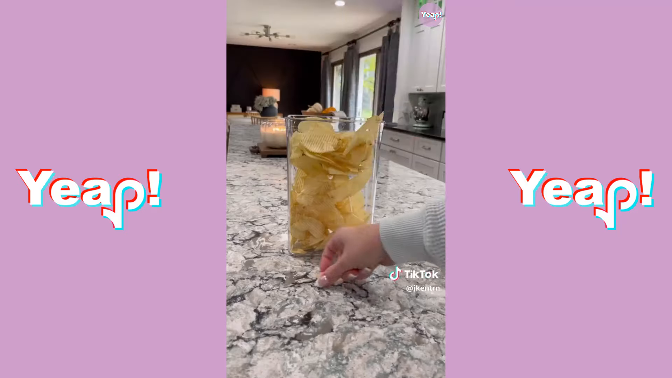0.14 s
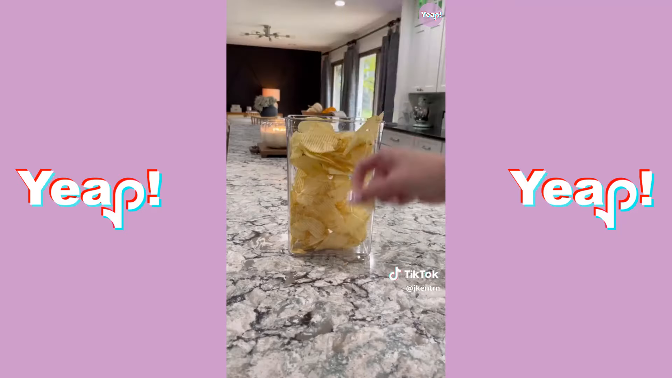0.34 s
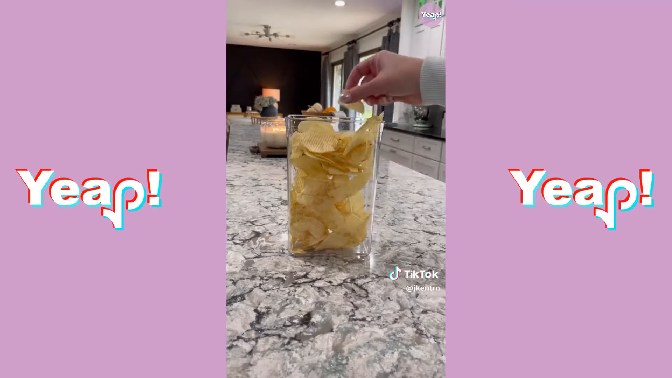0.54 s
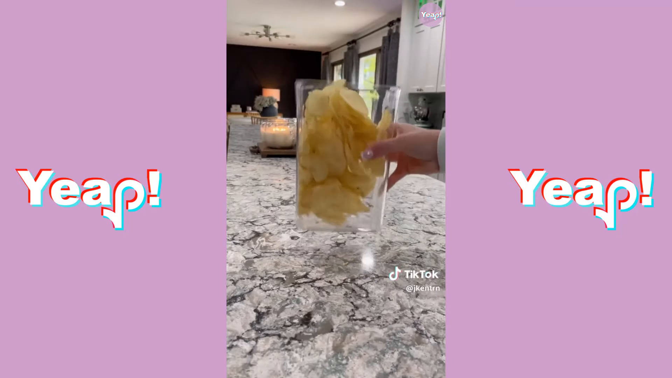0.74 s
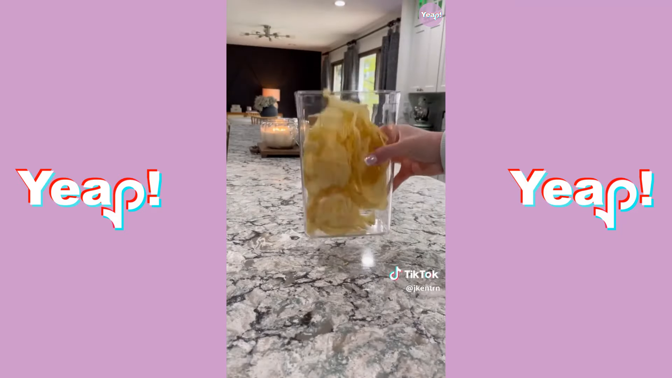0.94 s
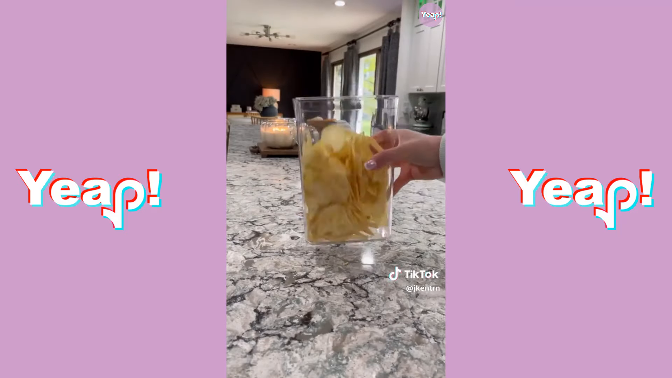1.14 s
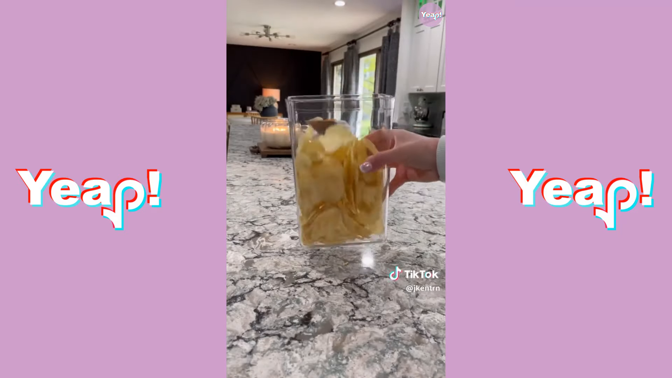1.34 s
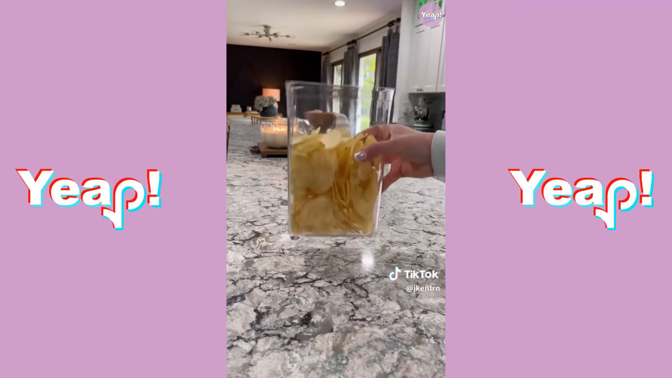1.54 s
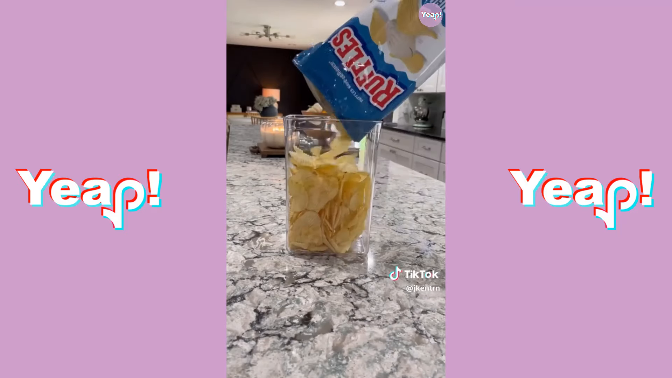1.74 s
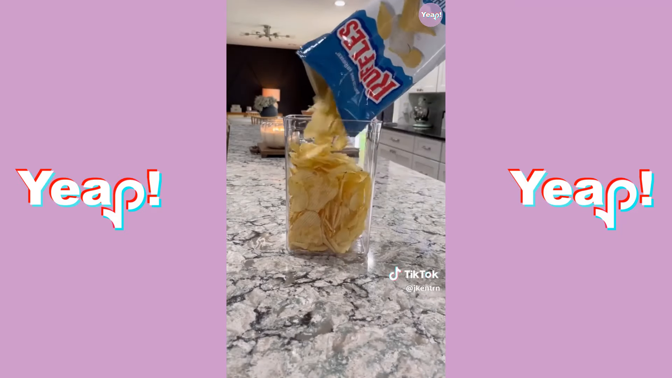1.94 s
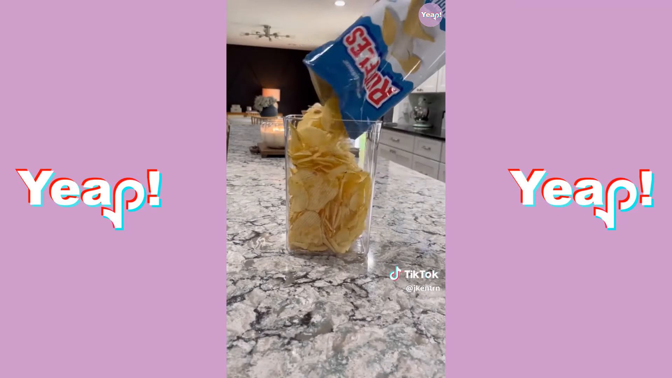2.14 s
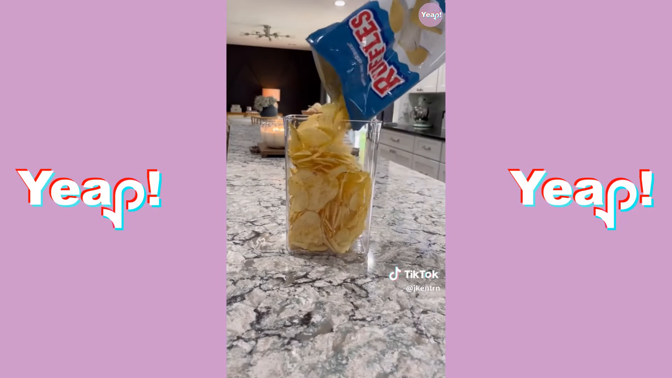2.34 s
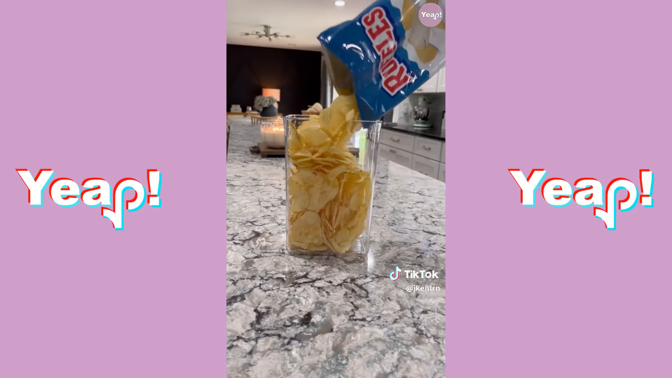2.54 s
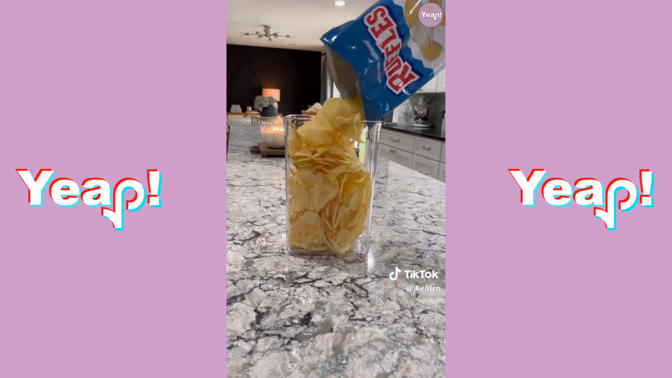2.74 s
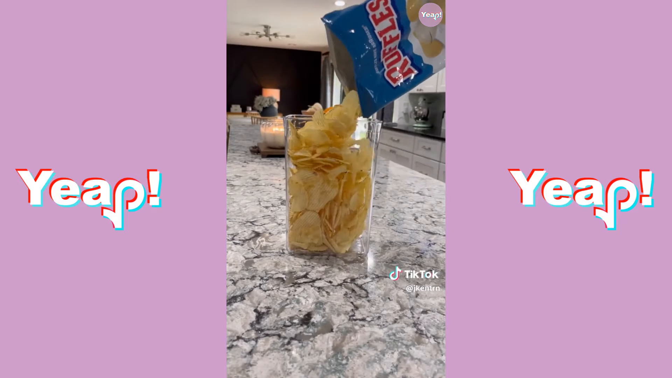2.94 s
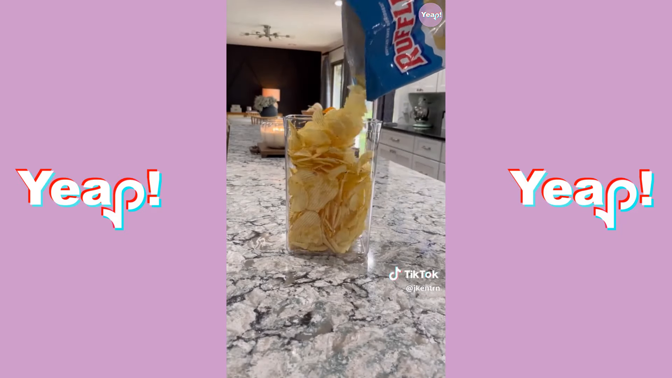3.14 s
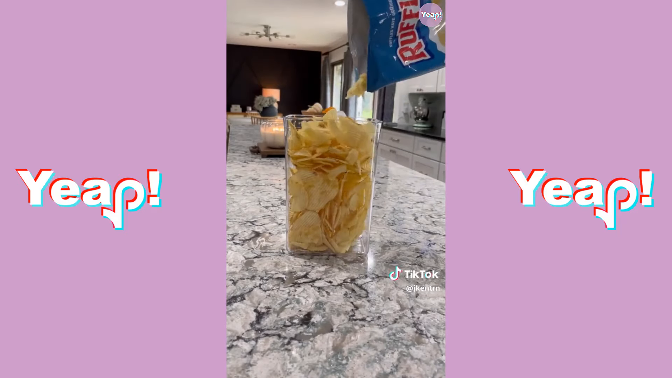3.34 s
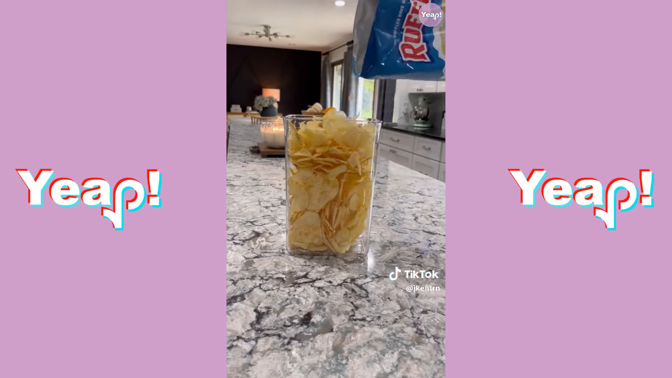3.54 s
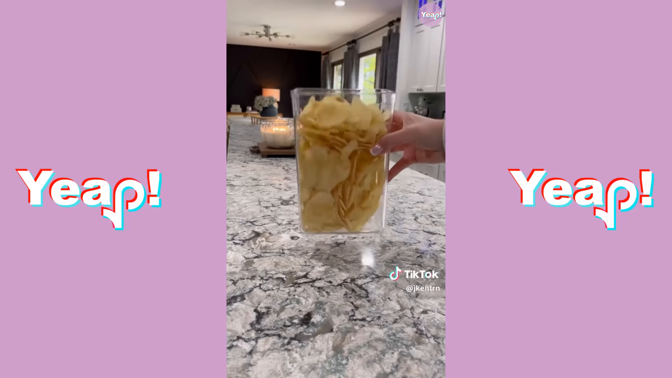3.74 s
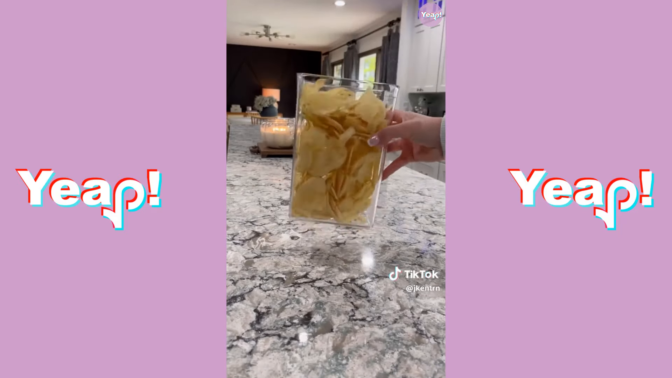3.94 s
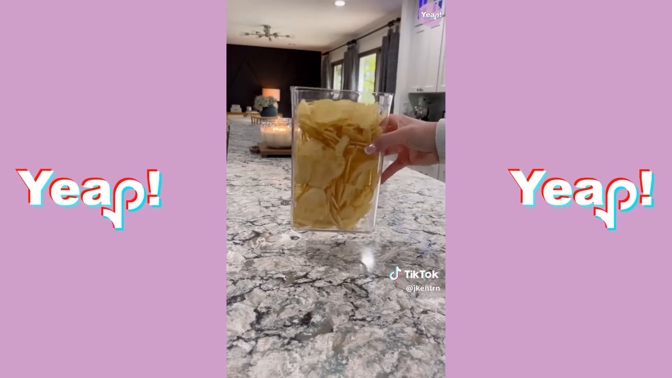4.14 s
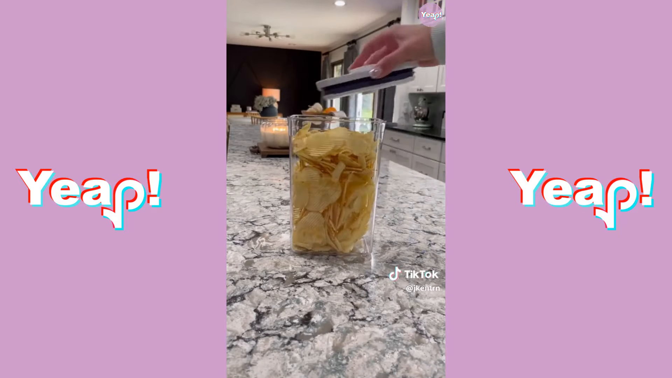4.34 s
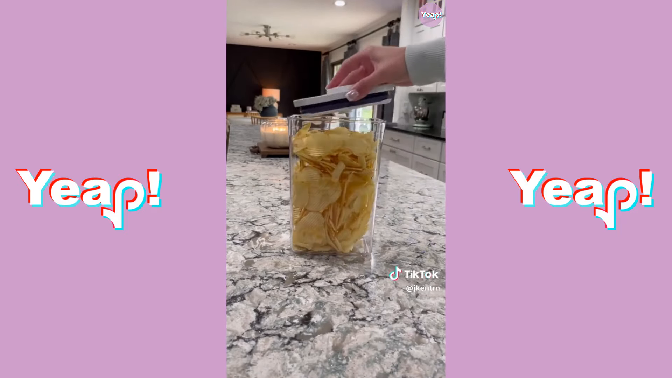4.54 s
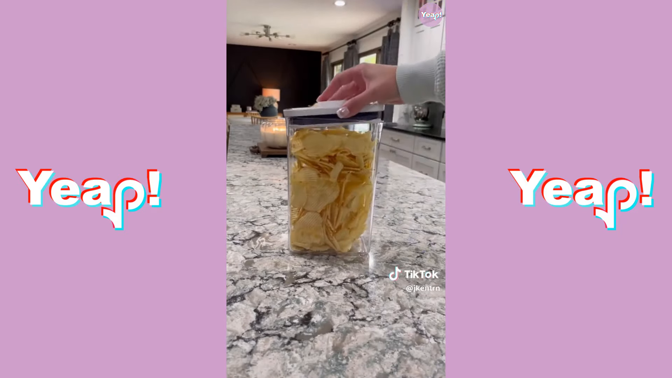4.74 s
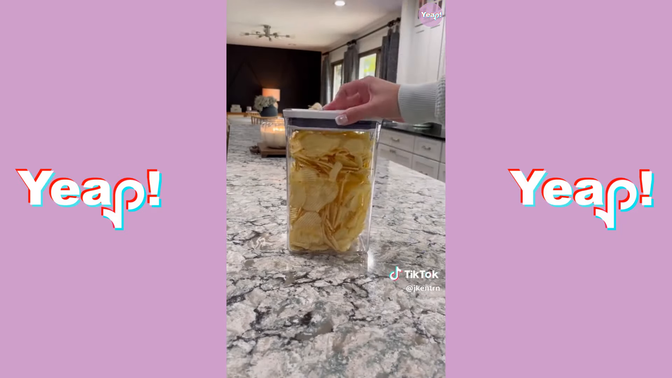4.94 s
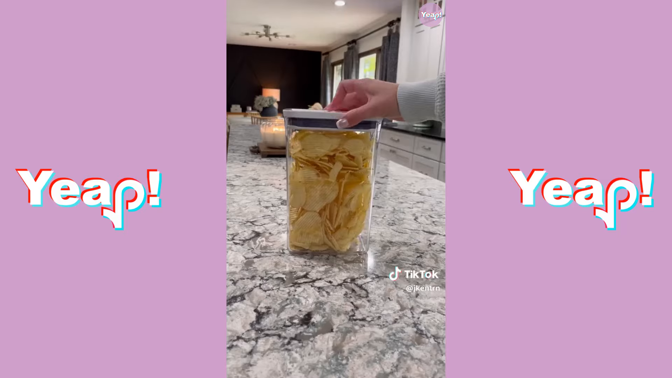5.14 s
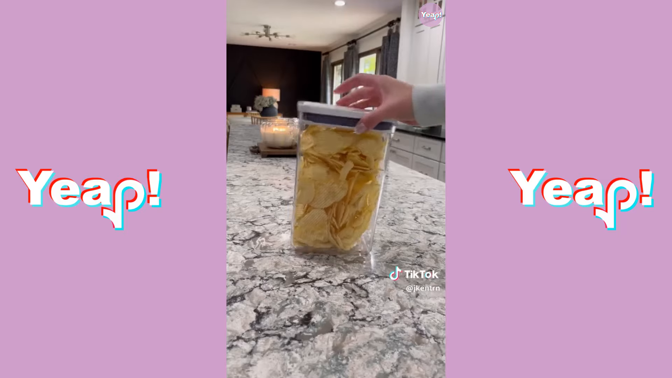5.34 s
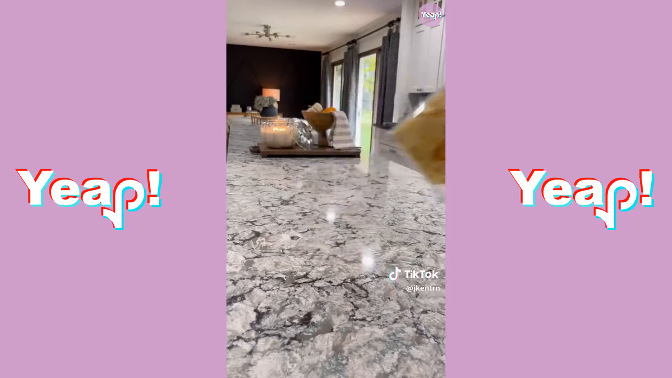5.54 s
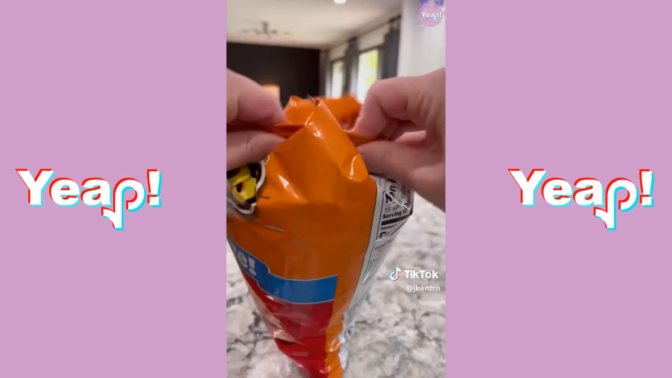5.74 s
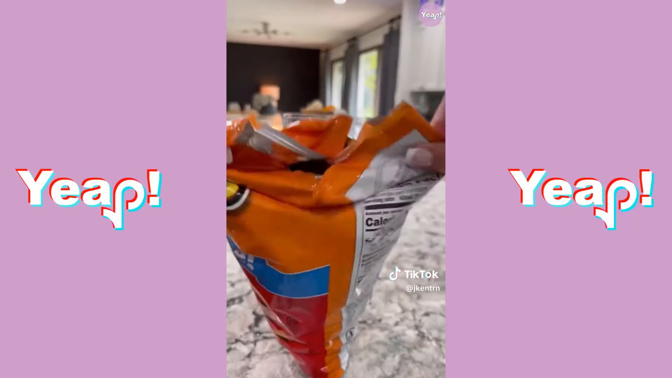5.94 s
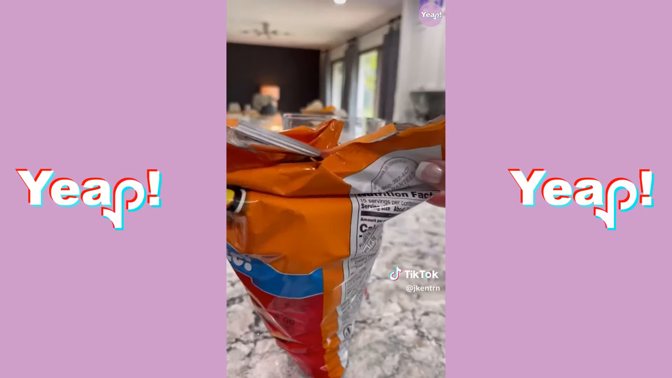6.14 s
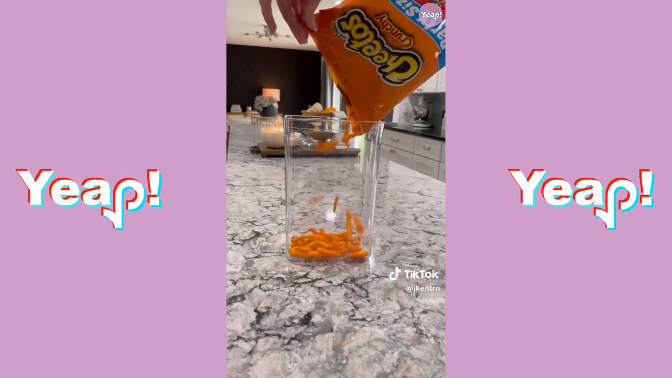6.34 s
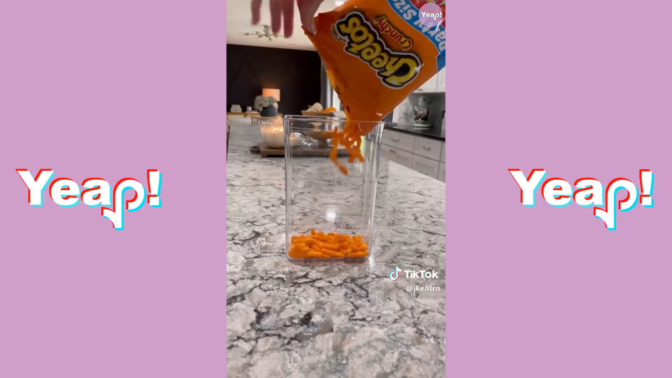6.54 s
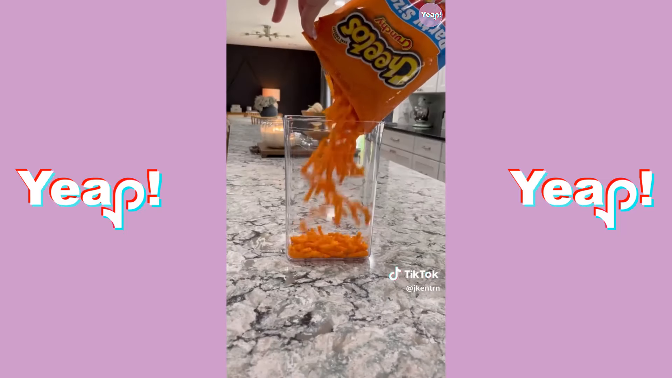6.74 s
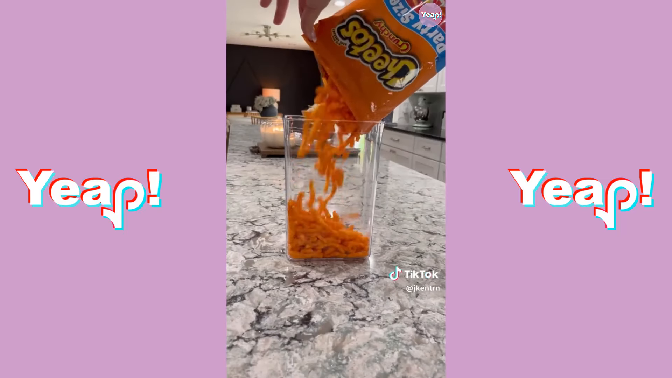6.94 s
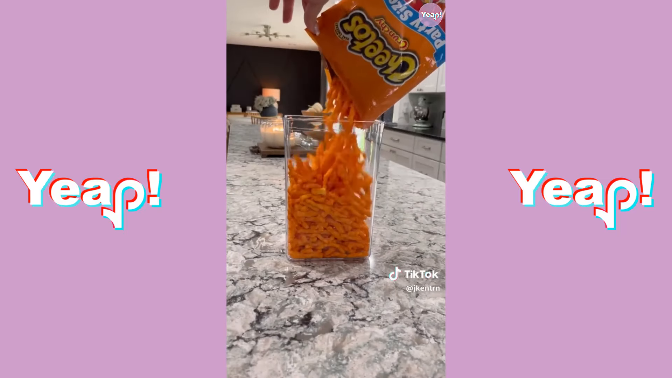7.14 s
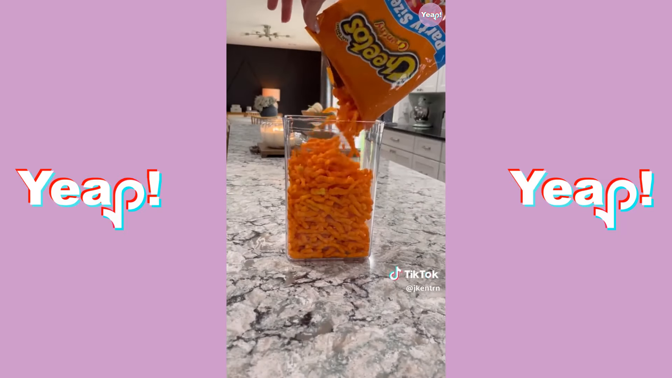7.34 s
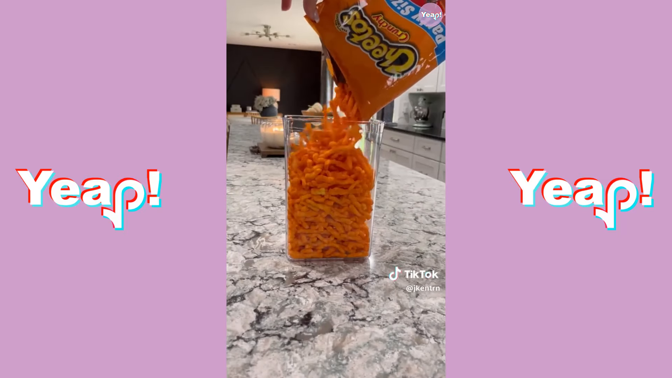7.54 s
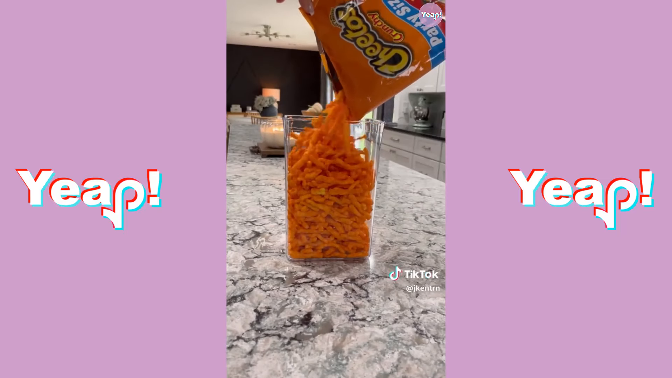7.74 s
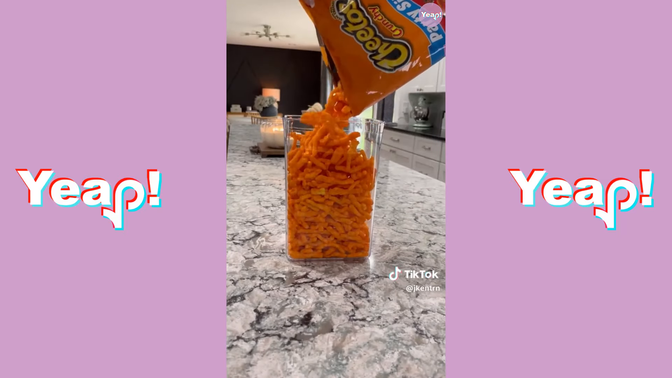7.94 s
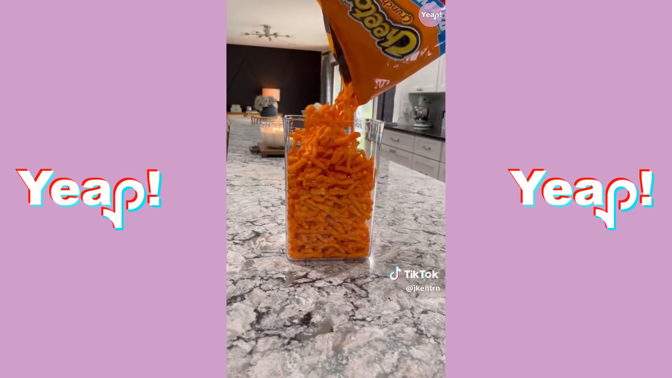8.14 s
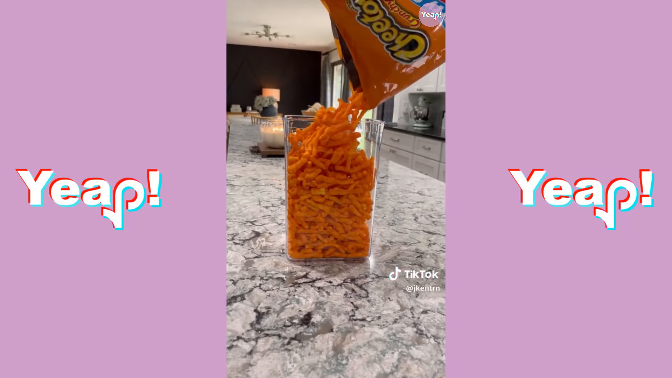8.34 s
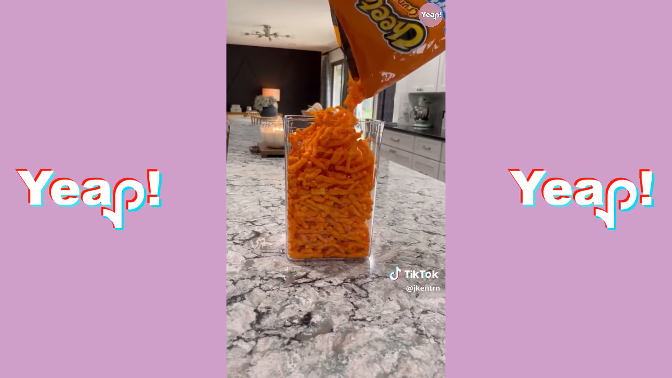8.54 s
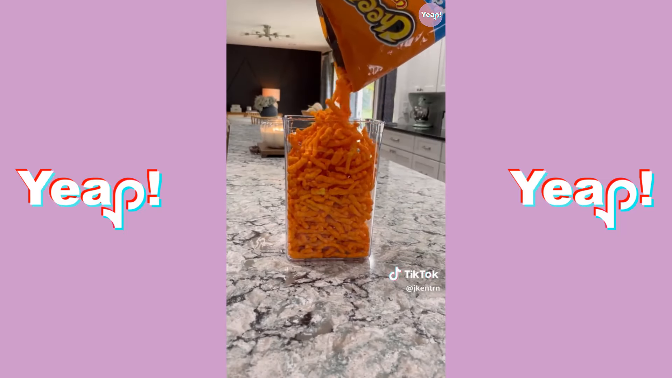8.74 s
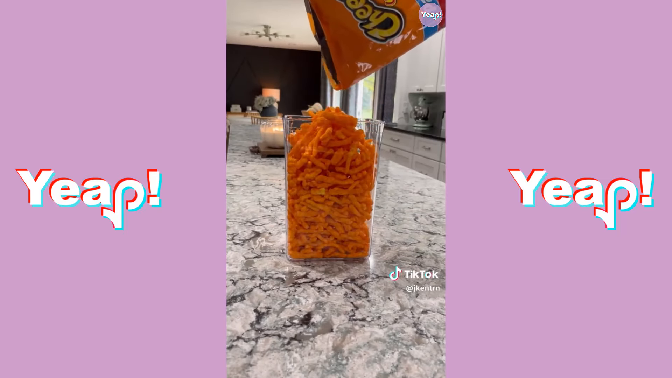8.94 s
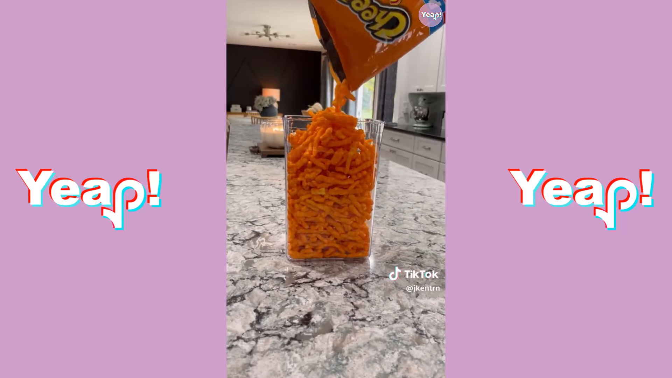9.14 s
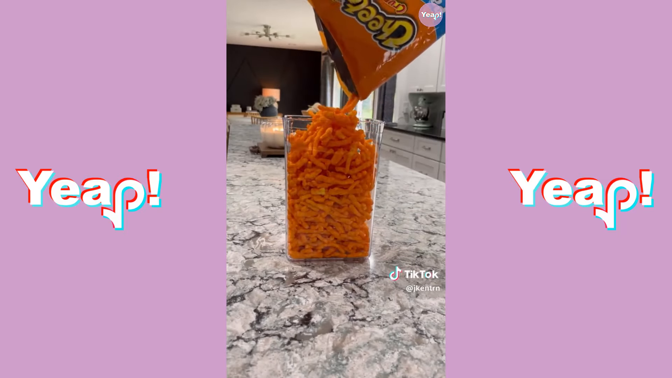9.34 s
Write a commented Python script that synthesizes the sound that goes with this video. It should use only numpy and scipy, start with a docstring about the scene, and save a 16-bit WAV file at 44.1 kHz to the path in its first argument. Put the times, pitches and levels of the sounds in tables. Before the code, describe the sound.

Close kitchen sounds: brittle chips rattling and thumping in a plastic tub, a snapping lid, foil tearing in two pulls, then a dense rush of corn puffs.

```python
"""A stone kitchen counter, heard close up in several shots joined by hard cuts, over an appliance's hum.
Potato chips slide from a foil bag into a plastic canister, are shaken down and topped up; the lid clicks shut.
A second bag is ripped open in two pulls and corn puffs pour into an empty canister.
Snacks and foil are built from many tiny noise fractures; canister, lid and bag panels ring as damped modes;
hard walls answer with decaying noise."""
import sys
import numpy as np
from scipy import signal
from scipy.fft import rfft, irfft, next_fast_len
from scipy.io import wavfile
from scipy.ndimage import map_coordinates

SR = 44100
rng = np.random.default_rng(int(sys.argv[2]) if len(sys.argv) > 2 else 0)


def wav_record(signal):
    """Record a signal, one row per channel, as 16-bit PCM in the file named by sys.argv[1]."""
    frames = np.transpose(np.atleast_2d(signal))
    bounded = np.clip(frames, -1, 1)
    # unit amplitude maps onto the largest positive 16-bit level
    quanta = np.round(bounded * 32767).astype(np.int16)
    wavfile.write(sys.argv[1], SR, quanta)


N = 414540
TIME = np.arange(N) / SR
SECOND_BAG_S = 6.35  # from here on, corn puffs instead of chips

# start of each shot and the end of the last: time [s]
CUTS = [0, 1.804, 4.395, 4.962, 5.377, 9.4]
# spectrum of plastic clicks and of a shaken foil sheet: (frequency [Hz], relative level per Hz [dB])
CLICK_SPECTRUM = [(100, -15), (230, 5), (400, 0), (700, -1), (1200, -5.5), (2000, -4), (3500, -12),
                  (8000, -25), (16000, -46.5)]
# the lid's catch ticks as it is pressed: (time [s], level [dB])
CATCH_TICKS = [(4.813, -37), (4.883, -32.5), (5.02, -43), (5.041, -39), (5.062, -33), (5.082, -30.5)]


def amp(db):
    """Decibels to gain."""
    return 10 ** (np.asarray(db) / 20)


def unit(x):
    """Scale to rms 1."""
    return x / np.sqrt(np.mean(x ** 2) + 1e-20)


def along(points, hz):
    """(Hz, value) points read on a log frequency axis."""
    f, v = np.transpose(points)
    return np.interp(np.log(hz + 1), np.log(f + 1), v)


def filtered(x, response):
    """x times a complex response of frequency."""
    m = next_fast_len(x.shape[-1] + 8192)
    spectrum = rfft(x, m) * response(np.fft.rfftfreq(m, 1 / SR))
    return irfft(spectrum, m)[..., :x.shape[-1]]


def high_passed(x, corner_hz, order):
    """Remove the bass below a corner without shifting phase."""
    return filtered(x, lambda hz: hz ** order / (hz ** order + corner_hz ** order))


def coloured(x, spectrum, size=2048):
    """Causal minimum-phase filter of unit energy with the given spectrum."""
    cepstrum = irfft(np.log(amp(along(spectrum, np.fft.rfftfreq(size, 1 / SR)))))
    cepstrum[1:size // 2] *= 2
    cepstrum[size // 2 + 1:] = 0
    kernel = irfft(np.exp(rfft(cepstrum)))
    return signal.oaconvolve(x, kernel[None] / np.linalg.norm(kernel), axes=1)[:, :x.shape[1]]


def add(track, s, sound):
    """Mix a sound into a track at time s."""
    part = track[:, max(round(s * SR), 0):][:, :sound.shape[-1]]
    part += sound[..., :part.shape[1]]


def wobble(rate):
    """A smooth random curve, rate knots a second."""
    knots = rng.standard_normal(int(N * rate / SR) + 4)
    coarse = TIME[::32]
    return np.interp(TIME, coarse, map_coordinates(knots, [coarse * rate]))


def surges(rows, rise):
    """Gain of bursts that swell 60 dB in rise seconds, hold and die away; their powers add."""
    power = np.zeros((1, N))
    t = np.arange(SR) / SR - .1
    for s, db, hold, t60 in rows:
        fade = np.maximum(-t / rise, 0) + np.maximum((t - hold) / t60, 0)
        add(power, s + t[0], amp(db - 60 * fade) ** 2)
    return np.sqrt(power[0])


def crack(t60, attack=0.00031, size=2048):
    """One brittle fracture, mid and side: it spreads through the piece, then dies away."""
    t = np.arange(size) / SR
    return rng.standard_normal((2, size)) * amp(-60 * t / t60) * (1 - np.exp(-t / attack))


def crackle(rate, spread_db, t60, count=8):
    """Dense tiny fractures of uneven size, in several families that each ring differently."""
    out = np.zeros((2, N))
    for _ in range(count):
        where, size, sign = rng.random((int(rate * N / SR / count), 3)).T
        sizes = amp(spread_db * np.minimum(-np.log(1 - size), 3)) * np.sign(sign - .5)
        train = np.bincount((where * N).astype(int), sizes, N)
        out += signal.oaconvolve(train[None], crack(t60, size=512), axes=1)[:, :N]
    return unit(out)


def ping(hz, cycles, size=2048):
    """A damped swing that has fallen 60 dB after some cycles."""
    turns = hz * np.arange(size) / SR
    return amp(-60 * turns / cycles) * np.sin(2 * np.pi * turns)


def scattered(gain, rate, db, spread_db):
    """Random events (s, dB) whose strength follows a gain curve."""
    where, size = rng.random((int(rate * N / SR), 2)).T
    levels = 20 * np.log10(gain[(where * N).astype(int)] + 1e-9) + db + spread_db * (2 * size - 1)
    return list(zip(where * N / SR, levels))


def movement(start, end):
    """Gain of one movement of the hand: it sets in, lasts and dies away, or stops at the next cut."""
    onset_s, stop_t60_s = 0.008, 0.4
    cut = min(s for s in CUTS if s > (start + end) / 2)
    onset = np.clip((TIME - start) / onset_s, 0, 1)
    return onset * amp(-60 * np.maximum(TIME - end, 0) / stop_t60_s) * (TIME < cut)


def snacks():
    """Pieces tumble in clumps and jolt as a heap; their contacts crunch, clack and drive the canister."""
    # a clump slides out of the bag or off the wall and lands: (time [s], level [dB], hold [s])
    clumps = [(.04, -35.5, 0.018), (1.772, -29.5, 0.02), (1.871, -34.5, .02), (1.95, -34.5, .07),
              (2.092, -29.5, 0.04), (2.195, -38.5, .06), (2.345, -38, 0.02), (2.469, -37, 0.028),
              (2.717, -34.5, 0.029), (2.83, -34.5, 0.014), (2.965, -45, 0.132), (3.317, -35.5, 0.036),
              (6.4, -22, 0.011), (6.45, -19.5, 0.0085), (6.523, -25, 0.028), (6.724, -21, 0.0145),
              (6.775, -20, 0.0064), (6.846, -18.3, 0.07), (6.955, -31.5, 0.076), (7.187, -27, 0.091),
              (7.635, -37, 0.08), (7.85, -35.5, 0.013), (8.311, -44, 0.054)]
    # spectrum of the direct crunch: (frequency [Hz], relative level per Hz [dB])
    crunch_spectrum = [(100, -23), (200, -1.5), (310, 9.5), (540, -10), (720, 1.5), (1200, -11.5),
                       (2350, 1), (3200, -11.5), (4400, -11.5), (7000, -10), (10000, -15.5), (14000, -8)]
    clump_t60_s = 0.085
    thump_db, hard_landing_db = -8.5, -11  # drumming on bare plastic grows faster than the landing
    thump_ring_db, strike_ring_db = -19.5, -11.5  # push of thumps and hard ticks on the canister

    (poured, bare), (rustle, tosses, shaken_bare) = pouring(), shaking()
    smack, push = slaps()
    ticks = strikes()
    flow = (poured + rustle) * amp(3.2 * wobble(40))
    landings = surges([(s, db, hold, clump_t60_s) for s, db, hold in clumps], rise=0.036)
    jolt = amp(-3.0) * (tosses + landings)

    contacts = flow * crackle(rate=700, spread_db=1.5, t60=0.0056, count=12)
    contacts += jolt * crackle(rate=1000, spread_db=2.0, t60=0.0053)
    # corn puffs are softer than chips: less of the highest treble, more around 4.5 kHz
    puff_tone = [(300, -0.5), (700, -0.5), (2000, 2.5), (4500, 4.5), (8000, -3.0), (14000, -6.5)]
    puffs = filtered(contacts, lambda hz: amp(along(puff_tone, hz)))
    contacts = np.where(TIME < SECOND_BAG_S, contacts, puffs)

    knocks = np.hypot(flow, jolt) * clacks(rate=260, spread_db=4, pitch_hz=1797, cycles=16)
    share = np.clip(np.where(rustle > poured, shaken_bare, bare), 0, 1)  # share on bare plastic
    drumming = amp(thump_db) * share * jolt * np.sqrt(jolt / amp(hard_landing_db))
    thumps = drumming * clacks(rate=530, spread_db=7, pitch_hz=665, cycles=8.7)
    knocks = high_passed(amp(-4.5) * knocks + thumps + smack, 350, order=4)

    direct = amp(0.5) * np.sqrt(1 - share) * coloured(contacts, crunch_spectrum)
    drive = np.sqrt(share) * contacts + amp(thump_ring_db) * thumps + push + amp(strike_ring_db) * ticks
    return direct + canister(drive) + knocks + ticks


def pouring():
    """Gain of the flow as a bag is tipped, and the share that hits bare plastic until the heap covers it."""
    # flow swells, peaks and ebbs to a trickle:
    # (start [s], peak [s], end [s], peak level [dB], ebb time [s], heap reaches the rim [s])
    pours = [(0, 0.24, 0.26, -37, 0.17, 0.44), (1.796, 2.0, 3.64, -43, 1.54, 2.07),
             (6.38, 7, 9.4, -28.7, 0.65, 7.82)]
    swell_db_per_s, trickle_db = 22.5, -60.5
    bare_share, cover_s = 0.98, 0.66  # the share falls to nothing as the heap nears the rim
    flow, share = np.zeros((2, N))
    for start, peak, end, db, ebb, full in pours:
        left = np.exp(-np.maximum(TIME - peak, 0) / ebb)
        swell_db = swell_db_per_s * np.maximum(peak - TIME, 0)
        level_db = trickle_db + (db - trickle_db) * left - swell_db
        flow += movement(start, end) * amp(level_db)
        share = np.where(TIME < start, share, bare_share * np.clip((full - TIME) / cover_s, 0, 1))
    return flow, share


def shaking():
    """Gains of the rustle and of even tosses that land the whole heap, and the share on bare plastic."""
    # (start [s], end [s], rustle [dB], first toss [s], period [s], first toss level [dB], bare share [0-1])
    shakes = [(0.762, 1.789, -45, .869, .184, -17.5, 0.97), (3.743, 4.263, -46.5, 3.78, 0.1684, -28, 0.575)]
    toss_hold_s, toss_t60_s, toss_loss_db = 0.026, 0.11, 2.5  # the first toss is the strongest
    rustle, tosses, share = np.zeros((3, N))
    for start, end, rustle_db, first, period, toss_db, bare in shakes:
        share = np.where(TIME < start, share, bare)
        rows = [(s, toss_db - toss_loss_db * np.sqrt(k), toss_hold_s, toss_t60_s)
                for k, s in enumerate(np.arange(first, end, period))]
        held = movement(start, end)
        rustle += held * amp(rustle_db)
        tosses += held * surges(rows, rise=0.069)
    return rustle, tosses, share


def clacks(rate, spread_db, pitch_hz, cycles, size=900):
    """Whole pieces collide: each rings for a few cycles at its own pitch."""
    where, strength, shape = rng.random((int(rate * N / SR), 3)).T
    detune = np.clip(0.395 * np.log(shape / (1 - shape)), -1.1, 1.6)
    hz = pitch_hz * np.exp(detune)[:, None]
    strengths = amp(spread_db * np.minimum(-np.log(1 - strength), 3))[:, None]
    rings = strengths * ping(hz, cycles, size=size)
    places = (where * N).astype(int)[:, None] + np.arange(size)
    return unit(np.bincount(places.ravel(), rings.ravel(), N)[:N])


def slaps():
    """The dry two-pitch smack of each clump on the plastic, and the push that it gives the canister."""
    # a clump slaps the wall or bottom: (time [s], level [dB], pitch [Hz])
    slap_hits = [(.868, -11, 715), (.874, -6, 680), (.95, -12, 725), (1.058, -14.5, 940),
                 (1.24, -21.5, 854), (1.422, -12.5, 895), (1.452, -11.5, 570), (1.615, -16.5, 860),
                 (1.77, -21.5, 786), (1.786, -10, 1460), (2.352, -29, 900), (2.39, -27.5, 820),
                 (2.632, -31, 790), (3.962, -23, 970), (4.005, -25, 910), (6.397, -21, 820),
                 (6.447, -14.5, 776), (6.458, -16, 690), (6.518, -16.5, 1720), (6.724, -15, 690),
                 (6.84, -11, 700), (7.036, -19, 670), (7.103, -22, 644), (7.435, -27, 610),
                 (7.849, -28.5, 840), (8.902, -31, 819)]
    cycles, smack_db, push_db = 14, -1, 9.5
    smack, push = np.zeros((2, 2, N))
    for s, db, hz in slap_hits:
        overtone = amp(-12.0) * ping(hz * rng.uniform(2.5, 2.6), cycles)
        add(smack, s, amp(db + smack_db) * (ping(hz, cycles) + overtone))
        add(push, s, amp(db + push_db) * np.ones(1))  # a one-sample impulse
    return smack, push


def strikes(count=5):
    """A single hard piece gives a dry tick with a few short pitches of its own and bounces once."""
    # single pieces strike the heap or the rim: (time [s], level [dB])
    placed = [(1.894, -18), (1.955, -25.5), (2.008, -18), (2.019, -19), (2.14, -23), (2.214, -25),
              (2.349, -29.5), (2.473, -27), (2.867, -28.5), (2.959, -25.5), (3.02, -31), (3.092, -28),
              (3.916, -33), (4.142, -27), (6.449, -7.5), (6.52, -13), (6.757, -13), (6.785, -13),
              (6.841, -9), (6.948, -15.5), (7.322, -18), (7.38, -12.5), (7.563, -21), (7.682, -20),
              (7.792, -21.5), (7.849, -16), (7.867, -22.5), (7.924, -21.5), (8.031, -25.5), (8.262, -32.5),
              (8.305, -20.5), (8.319, -26), (8.344, -24.5), (8.461, -29), (8.546, -24.5), (8.615, -29.5),
              (8.682, -31), (8.728, -35), (8.809, -32), (8.9, -26.5), (9.058, -28), (9.102, -34),
              (9.358, -37.5)]
    strays = scattered(pouring()[0], rate=24, db=2, spread_db=5.5)  # level against the flow
    out = np.zeros((2, N))
    t = np.arange(2048) / SR
    for s, db in placed + strays:
        pitches_hz = rng.uniform(700, 4200, (count, 1))
        ring = np.sin(2 * np.pi * pitches_hz * t).sum(0) * amp(-60 * t / 0.013)
        add(out, s, amp(db) * (crack(t60=0.016) + 0.15 * ring))
        add(out, s + rng.uniform(0.0035, .012), amp(db - 6) * crack(t60=0.024))  # the bounce
    tone = [(200, -7.5), (700, 0), (1250, -3.5), (1700, 3.5), (2600, 6.0), (3200, -3.0),
            (4400, 2), (5500, -7.5), (8000, -9.5), (15000, -10.5)]
    return amp(-5.5) * coloured(out, tone)


def canister(x):
    """Walls and air column resonate: the first with chips in it, the second from empty to puff-loaded."""
    # modes when empty: (frequency [Hz], width [Hz], level [dB])
    empty_modes = [(650, 18, 12), (789, 15, 12.5), (1120, 13, -14), (1540, 50, -3), (1704, 53, 2),
                   (2140, 37, -5), (2600, 69, -3.5)]
    # modes loaded with corn puffs: (frequency [Hz], width [Hz], level [dB])
    puff_modes = [(319, 33, -8), (388.4, 12.6, 6), (476, 27, -3), (647.5, 39, 4), (832, 35, -0.5),
                  (1076, 30, -9), (1647, 70, -8)]
    # modes loaded with chips: (frequency [Hz], width [Hz], level [dB])
    chip_modes = [(399, 42, 1), (474, 28, -3), (642, 25, 2), (823, 70, 0), (1662, 95, -8)]
    # broad hollow colour: (frequency [Hz], relative level per Hz [dB])
    hollow_spectrum = [(130, -47), (250, -0.5), (320, 7.5), (440, 12), (540, -17), (900, 4), (1400, -4.5),
                       (2600, -7), (3400, -9.5), (4700, -10.5), (7000, -11), (13000, -9)]
    loaded_s, loading_s = 6.78, 0.32  # puffs cover the bottom by this time, and take this long to do so

    def ring(modes):
        def response(f):
            return sum(amp(db) * 1j * f * w / (c * c - f * f + 1j * f * w) for c, w, db in modes)
        return filtered(x, response)

    loaded = np.clip(1 + (TIME - loaded_s) / loading_s, 0, 1)
    second = (1 - loaded) * ring(empty_modes) + loaded * ring(puff_modes)
    ringing = np.where(TIME < SECOND_BAG_S, ring(chip_modes), second)
    return amp(12.0) * ringing + amp(-7.0) * coloured(x, hollow_spectrum)


def foil():
    """Creases buckle in clumps; the largest give way with a snap and shake the sheet around them."""
    # large creases snap: (time [s], level [dB], sheet level against the snap [dB])
    large = [(0.1811, -18.5, -5), (0.2047, -24.5, -15), (0.2815, -21, -4), (0.4555, -28.5, -6),
             (0.6955, -32.5, -4), (2.008, -14, -20), (3.63, -33, -23), (5.7668, -30, -4),
             (5.8262, -4.5, -14), (5.834, -13, -7), (5.8493, -13, -16), (5.866, -14.5, -10),
             (5.932, -17, -3), (6.122, -23.5, -12), (6.131, -20, -9), (6.156, -14.5, -11),
             (6.175, -25.5, -4), (6.183, -11, -9), (6.266, -28, -2.5), (6.284, -21, -8.5),
             (6.3185, -14, -25), (6.3374, -24.5, -11.5), (6.787, -13.5, -16), (7.105, -17.5, -10),
             (7.1835, -9, -24), (7.28, -17, -18), (7.4347, -12.5, -13), (7.45, -14, -16),
             (7.641, -13.5, -14), (7.9961, -22, -3), (8.9907, -23, -21)]
    # spectrum of the crinkling: (frequency [Hz], relative level per Hz [dB])
    crinkle_spectrum = [(150, -20), (300, 5.5), (2500, 3), (8000, -1.5), (13000, 4.5), (16000, -9)]
    small_body_db = -8.5
    creases = crackle(rate=900, spread_db=4, t60=.004, count=12)
    flex = flexing()
    # small creases snap at random while a bag is flexed; level against the flexing
    small = [(s, db, small_body_db) for s, db in scattered(flex, rate=38, db=10, spread_db=8)]
    bed = amp(-6.5) * flex * amp(3.7 * wobble(39)) * coloured(creases, crinkle_spectrum)
    edge, sheet = np.zeros((2, 2, N))
    for s, db, body_db in large + small:
        add(edge, s - rng.uniform(0.0024, 0.0079), amp(db - 12) * crack(t60=0.045))  # starts to yield
        add(edge, s, amp(db) * crack(t60=0.023))
        add(sheet, s, amp(db + body_db) * crack(t60=0.025))
    bright = coloured(edge, [(500, -17), (2500, -3.5), (6000, -2.5), (13000, 1.5), (16000, 7.0)])
    return bed + amp(-1.0) * bright + amp(-5.5) * coloured(sheet, CLICK_SPECTRUM)


def flexing():
    """Gain of the foil's crinkling: strongest as the hand takes hold, then slowly relaxing."""
    # a hand flexes a bag: (start [s], end [s], level [dB])
    flexes = [(0.126, 0.26, -36), (1.79, 3.625, -40.5), (6.063, 6.124, -40), (6.273, 6.293, -46),
              (6.457, 9.4, -38)]
    relax_db_per_s = 6.5
    return sum(movement(start, end) * amp(db - relax_db_per_s * np.maximum(TIME - start, 0))
               for start, end, db in flexes)


def bag():
    """The glued seam parts in a run of small breaks while the panels flap and pop."""
    # the seam rips: (time [s], level [dB], hold [s], 60 dB decay [s])
    rips = [(5.785, -30.5, .012, .1), (5.802, -21.5, 0.03, 0.23), (5.888, -30, .002, 0.027),
            (5.903, -26, 0.0022, 0.031), (5.932, -17.5, 0.056, 0.06)]
    # the panels bulge and flap: (time [s], level [dB], hold [s], 60 dB decay [s])
    flaps = [(5.812, -37, 0.02, 0.13), (5.945, -26.5, 0.042, 0.078)]
    # a panel pops inside out: (time [s], level [dB], pitch [Hz])
    panel_pops = [(5.932, -19, 342), (5.957, -20, 270), (5.981, -24, 290), (6.184, -25, 221)]
    # spectrum of the ripping seam: (frequency [Hz], relative level per Hz [dB])
    seam_spectrum = [(100, -24), (239, -4.5), (634, -9.5), (3300, -7), (5420, -11.5), (9210, -12),
                     (12700, -9), (16000, -13.5)]
    # spectrum of the rumbling panels: (frequency [Hz], relative level per Hz [dB])
    panel_spectrum = [(60, -22), (130, -7.5), (190, -7.5), (230, 4.5), (280, -2.5), (370, -2), (600, -11.5),
                      (2000, -61)]
    sway_db = -13  # the panels of a flexed bag rumble; level against the flexing
    breaks = crackle(rate=5000, spread_db=5.5, t60=0.0014)
    rip = surges(rips, rise=0.008) * coloured(breaks, seam_spectrum)
    rumble = coloured(crackle(rate=460, spread_db=3.5, t60=0.0021), panel_spectrum)
    flap = (surges(flaps, rise=0.061) + amp(sway_db) * flexing()) * rumble
    pops = np.zeros((2, N))
    for s, db, hz in panel_pops:
        add(pops, s, amp(db) * ping(hz, cycles=11))
    return amp(-1.5) * rip + amp(-2.5) * flap + high_passed(pops, 110, order=2)


def lid():
    """Knocks click, ring the lid's modes, thud in the box and rattle; the seal scrapes as it seats."""
    # canister and lid knock: (time [s], click level [dB], bright edge against the click [dB],
    # thud level [dB], thud pitch [Hz], thud 60 dB decay [s])
    knocks = [(0.007, -22.5, -27, -23, 320, 0.063), (0.51, -38, -5.5, -38.5, 165, .05),
              (3.931, -30, -20, -29, 310, .05), (4.075, -26.5, -9.5, -24.5, 313, 0.066),
              (4.243, -50, -16, -26.5, 322, .07), (4.566, -30, -15, -27, 290, 0.07),
              (4.596, -42, -15, -32.5, 307, 0.083), (4.725, -19, -3.5, -19, 246, 0.062),
              (4.827, -26.5, -9, -17, 246.5, 0.075), (5.088, -13, -1.5, -25.5, 190, 0.037),
              (5.21, -15, -8, -23, 270, 0.027)]
    # modes of the lid: (frequency [Hz], level [dB], 60 dB decay [s])
    lid_modes = [(485, 7, 0.032), (580, 2, 0.04), (820, 2, 0.039), (1650, -8.5, 0.017), (2260, -6, 0.02)]
    # the rubber seal and the fingers scrape over the plastic: (time [s], level [dB])
    scrapes = [(4.885, -34), (4.903, -30.5), (5.082, -41), (5.452, -63), (5.628, -62.5)]
    # the canister is nudged or pressed on the counter: (time [s], level [dB], hold [s], 60 dB decay [s])
    bump_moves = [(.175, -42, 0.053, .12), (.275, -45, 0.019, 0.1), (4.89, -43, 0.034, 0.066)]
    # spectrum of those bumps: (frequency [Hz], relative level per Hz [dB])
    thump_spectrum = [(40, -44), (80, -4), (135, 3), (200, -7.5), (400, -5.5), (1500, -63)]
    rattle_db, rattle_t60_s = -14, .1  # loose parts after a knock; level against its click
    drag_db = -18  # each tick of the catch drags the seal along; level against the tick
    scrape_hold_s, scrape_t60_s = 0.0054, 0.027

    click, edge, ring = np.zeros((3, 2, N))
    t = np.arange(SR // 3) / SR
    for s, db, bright_db, thud_db, thud_hz, thud_t60 in knocks:
        add(click, s - .003, amp(db - 7) * crack(t60=0.016))  # one corner touches first
        add(click, s, amp(db + 3.5) * crack(t60=0.0097))
        add(edge, s, amp(db + bright_db) * crack(t60=0.023))
        grip = 1 + 0.041 * rng.standard_normal(len(lid_modes))  # the hand and the seal shift the modes
        modes = sum(amp(level + rng.normal(0, 2.2) - 60 * t / t60) * np.sin(2 * np.pi * hz * k * t)
                    for (hz, level, t60), k in zip(lid_modes, grip))
        add(ring, s, amp(db - 14.5) * modes * (1 - np.exp(-t / 0.0024)))
        thud = amp(thud_db - 60 * t / thud_t60) * np.sin(2 * np.pi * thud_hz * t)
        add(ring, s, thud * (1 - np.exp(-t / 0.0023)))
        box_overtone = amp(thud_db - 60 * t / 0.022) * np.sin(2 * np.pi * 2.28 * thud_hz * t)
        add(ring, s, box_overtone)

    rattle = surges([(s, db + rattle_db, 0, rattle_t60_s) for s, db, *_ in knocks], rise=0.01)
    click += rattle * crackle(rate=600, spread_db=3, t60=0.0047)
    rubs = scrapes + [(s, db + drag_db) for s, db in CATCH_TICKS]
    rub_gain = surges([(s, db, scrape_hold_s, scrape_t60_s) for s, db in rubs], rise=0.039)
    slips = rub_gain * crackle(rate=3100, spread_db=1.5, t60=0.0038)
    seal = coloured(slips, [(200, 3.0), (700, 10.5), (1400, -5.0), (2350, -3.5), (3500, -5.0),
                            (7000, -7.0), (13000, -3.0)])
    bumps = surges(bump_moves, rise=0.12) * coloured(rng.standard_normal((2, N)), thump_spectrum)
    bright = coloured(edge, [(400, 0), (2200, 1.0), (3800, -9.0), (6200, -5), (7700, 0),
                             (12000, 1.5), (16000, -7.5)])
    clicks = amp(-1.5) * coloured(click, CLICK_SPECTRUM) + amp(-3.0) * bright
    return clicks + high_passed(ring, 90, order=2) + seal + bumps


def catch():
    """Small ticks ring the lid's stiff push button, whose pitch shifts under the finger."""
    # modes of the button: (frequency [Hz], level [dB], 60 dB decay [s])
    button_modes = [(900, 1, 0.016), (2250, 2.5, 0.017), (3950, -14, 0.0099)]
    out = np.zeros((2, N))
    t = np.arange(2048) / SR
    for s, db in CATCH_TICKS:
        grip = 1 + 0.089 * rng.standard_normal(len(button_modes))
        modes = sum(amp(level - 60 * t / t60) * np.sin(2 * np.pi * hz * k * t)
                    for (hz, level, t60), k in zip(button_modes, grip))
        add(out, s, amp(db) * modes + amp(db - 11) * crack(t60=.011))
    return out


def kitchen(x):
    """Hard walls answer with decaying noise, highs dying first; every cut between shots ends the tail."""
    # room send; the second bag opens right at the microphone, where the room is weaker against it:
    # (time [s], level [dB])
    room_level = [(0, -5.5), (4.4, -7.5), (4.6, -4.5), (5.4, -9), (5.75, -15.5), (6.35, -11.5), (6.42, -5),
                  (9.4, -9)]
    # decay of the room: (frequency [Hz], 60 dB decay [s])
    room_decay = [(220, 0.69), (500, 0.44), (2500, 0.44), (7000, 0.48), (14000, 0.27)]
    out = np.zeros((2, N))
    sent = filtered(x, lambda hz: hz / np.hypot(hz, 230))  # the walls return little bass
    sent = sent * amp(np.interp(TIME, *np.transpose(room_level)))
    for start, end in zip(CUTS, CUTS[1:]):
        shot = sent[:, round(start * SR):round(end * SR)]
        wet = np.zeros_like(shot)
        for i in range(0, shot.shape[1], SR // 4):  # a fresh random tail for every quarter second of sound
            hz, t, z = signal.stft(rng.standard_normal((2, SR // 2)), SR, nperseg=256)
            fade = amp(-60 * t / along(room_decay, hz)[:, None]) * (1 - np.exp(-t / 0.00053))
            tail = signal.istft(z * fade, SR, nperseg=256)[1]
            tail = tail / np.linalg.norm(tail[0])
            add(wet, i / SR, signal.fftconvolve(shot[:, i:i + SR // 4], tail, axes=1))
        add(out, start, wet)
    return x + out


def background():
    """Still room air as shaped noise, and an appliance's low sine hum, unsteady in level and phase."""
    # spectrum of the air: (frequency [Hz], relative level per Hz [dB])
    air_spectrum = [(25, -27), (50, -18.5), (70, 3), (100, -3), (300, -16), (1200, -30.5), (3000, -38.5),
                    (7000, -45.5), (15000, -39)]
    hum = amp(-61 + 2 * wobble(9)) * np.sin(2 * np.pi * 83.5 * TIME + .7 * wobble(9))
    air = coloured(rng.standard_normal((2, N)), air_spectrum)
    return amp(2.0) * hum + amp(-62.0) * air


def scene():
    """Everything sits in the middle; mainly the treble spreads to the sides."""
    # stereo width: (frequency [Hz], gain of the side signal [dB])
    side_gain = [(150, -38.5), (400, -23.5), (1100, -8.5), (2100, -31.5), (3200, -8.5), (6000, -8),
                 (15500, -7)]
    mid, side = kitchen(snacks() + foil() + bag() + lid() + catch()) + background()
    side = filtered(side, lambda hz: 1j * amp(along(side_gain, hz)))  # turned by a quarter cycle
    return np.array([mid + side, mid - side])


def record(dry):
    """The bass lags a little; the treble has two narrow dips and fades out toward a band limit."""
    top_hz = 16400
    lag_cycles = 1.24  # well above 20 Hz, each frequency is about this many of its own cycles late

    def dip(hz, centre_hz, width_hz, depth_db):
        return amp(-depth_db * np.exp(-((hz - centre_hz) / width_hz) ** 2))

    def response(hz):
        colour = dip(hz, 5850, 160, 6.7) * dip(hz, 10765, 620, 19.6) * dip(hz, 15940, 1100, 30)
        lag = np.exp(-2j * np.pi * lag_cycles * np.log(1 + hz / 20))
        return colour * lag * (hz < top_hz)

    return filtered(dry, response)


dry = scene()
out = record(dry)
wav_record(out)
```